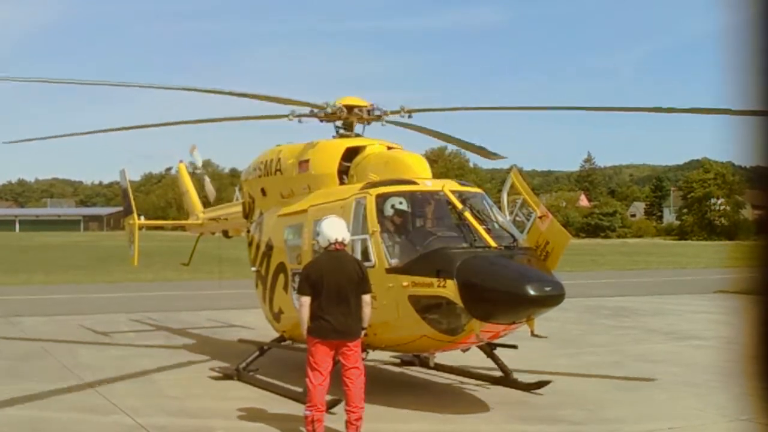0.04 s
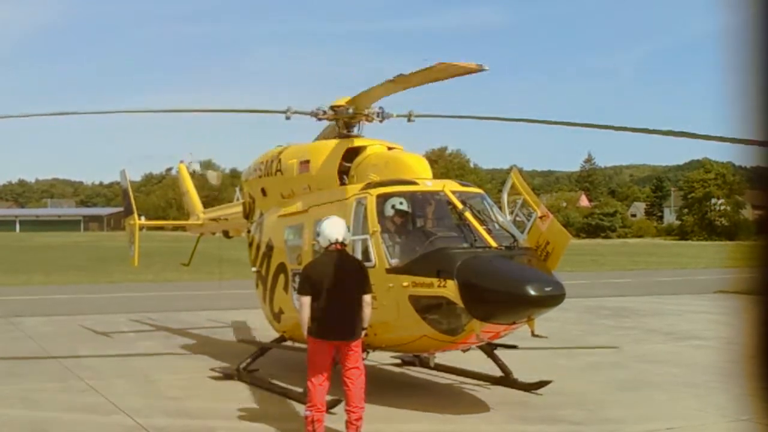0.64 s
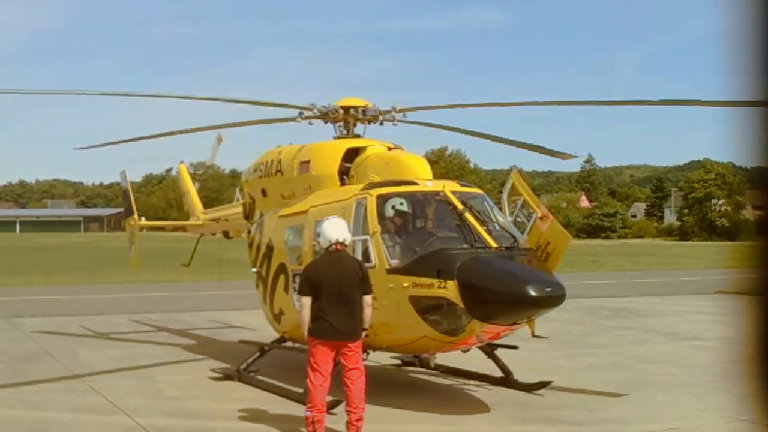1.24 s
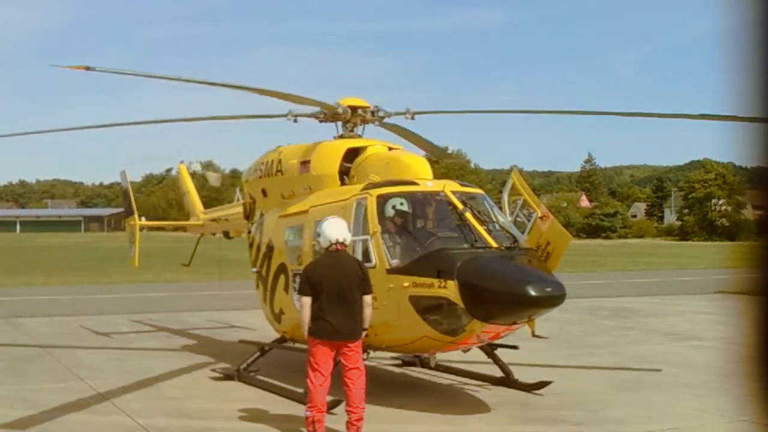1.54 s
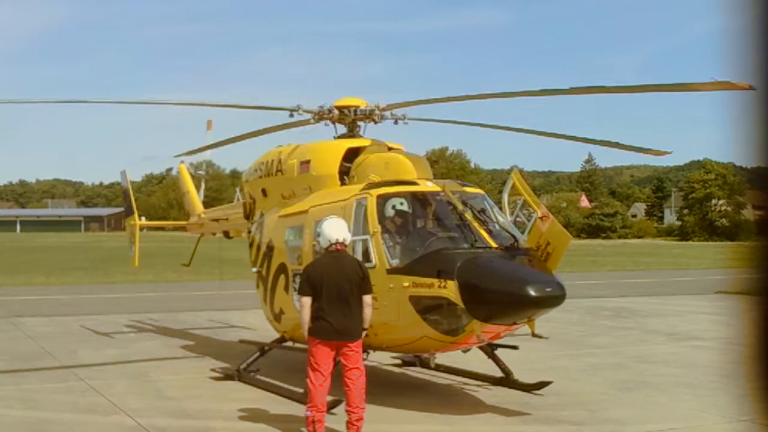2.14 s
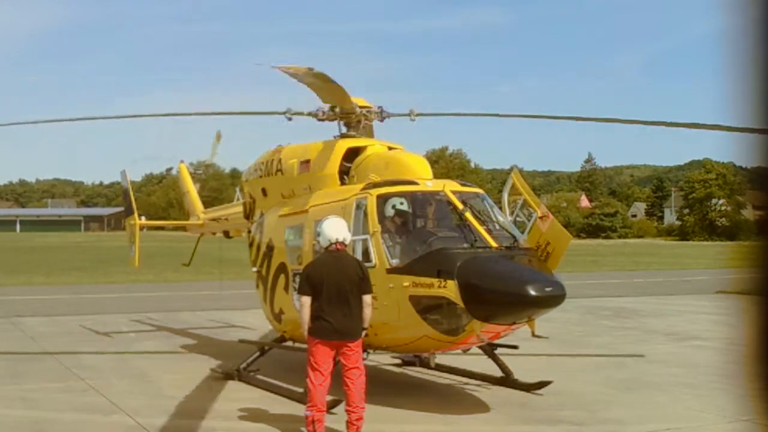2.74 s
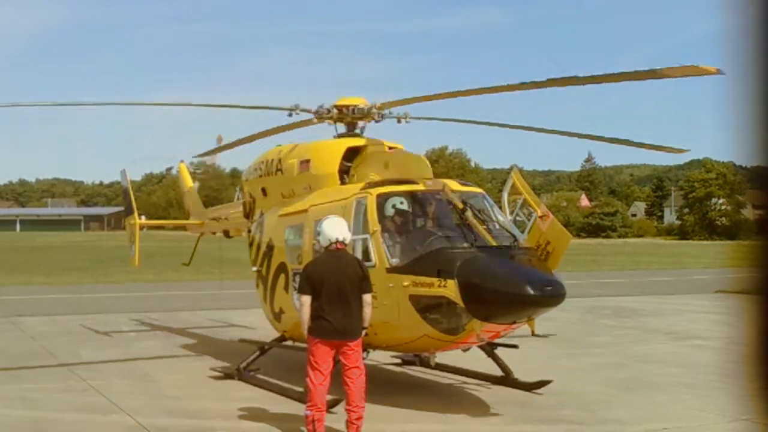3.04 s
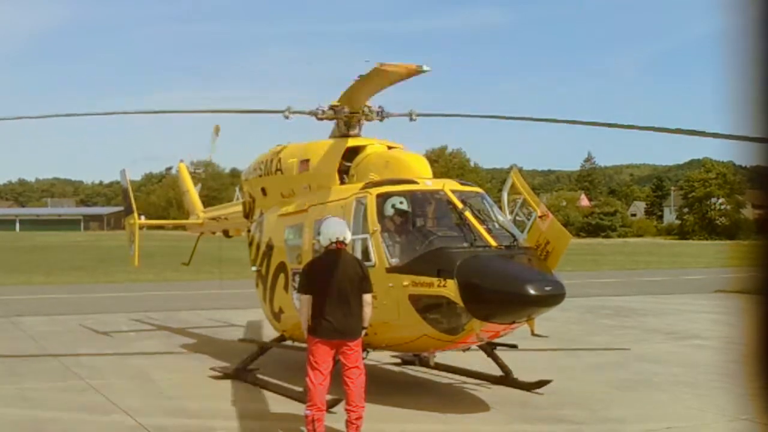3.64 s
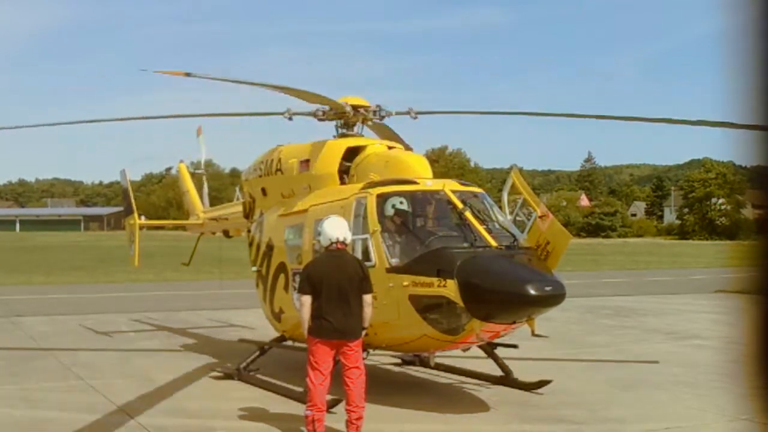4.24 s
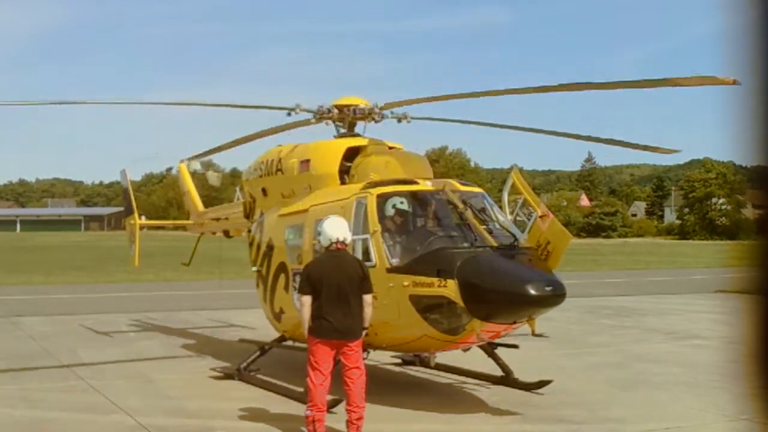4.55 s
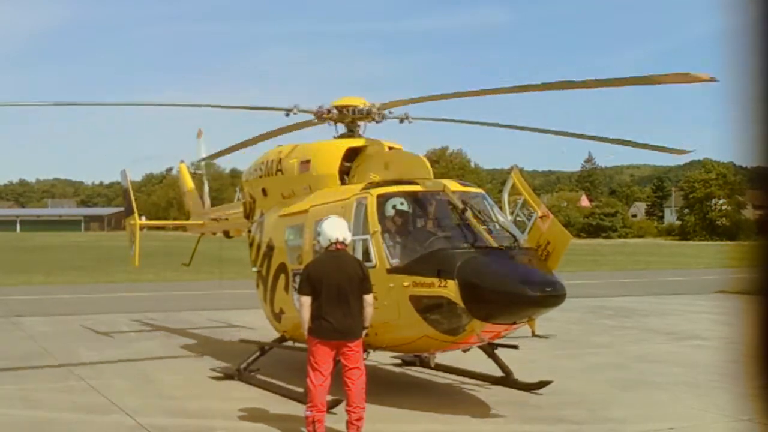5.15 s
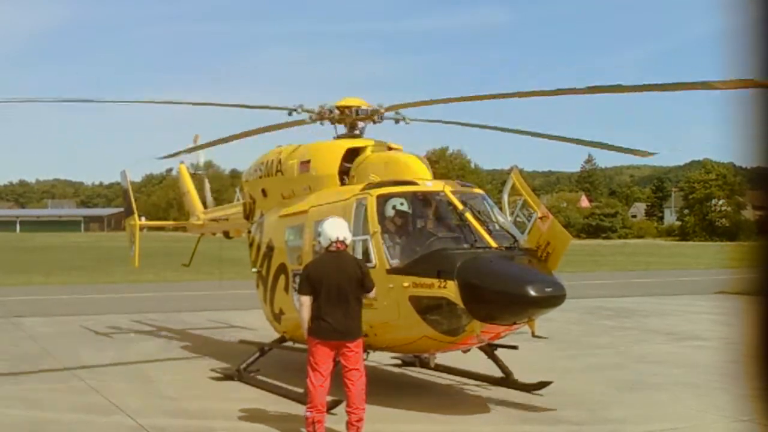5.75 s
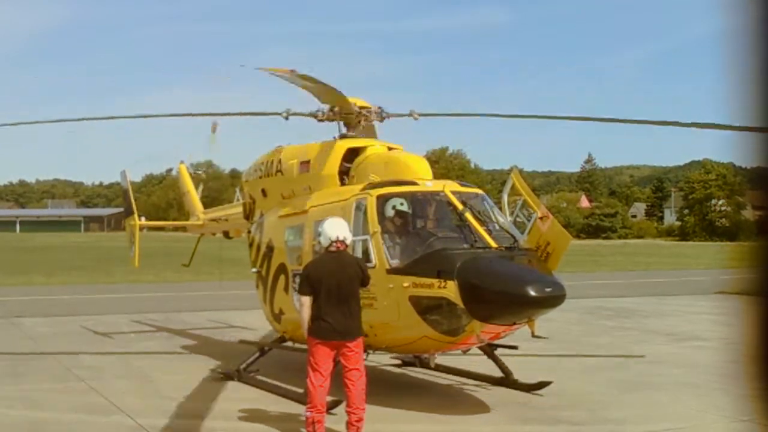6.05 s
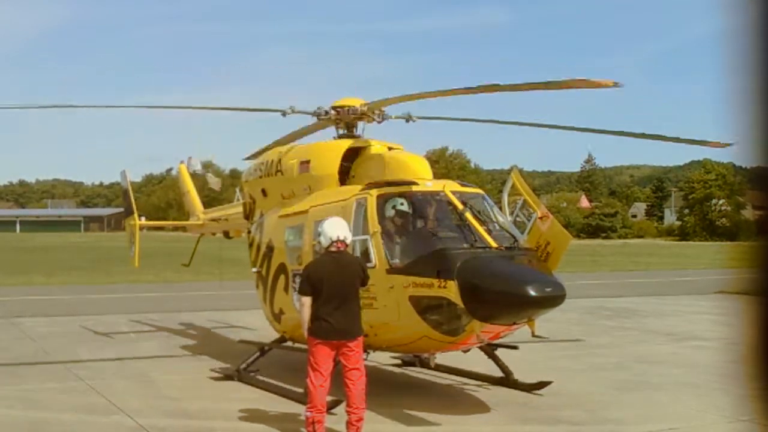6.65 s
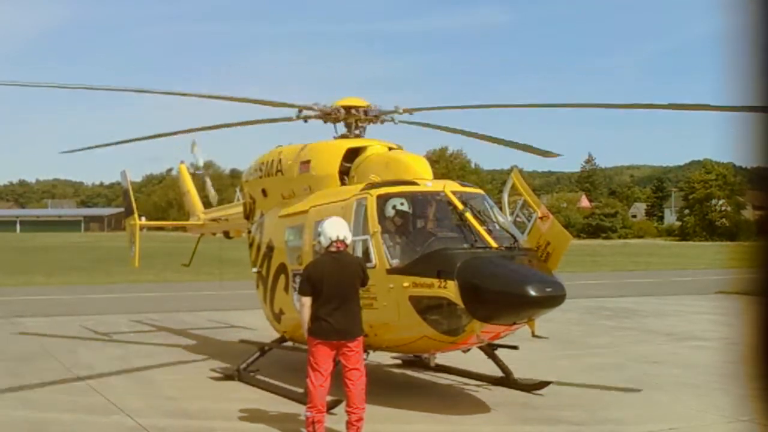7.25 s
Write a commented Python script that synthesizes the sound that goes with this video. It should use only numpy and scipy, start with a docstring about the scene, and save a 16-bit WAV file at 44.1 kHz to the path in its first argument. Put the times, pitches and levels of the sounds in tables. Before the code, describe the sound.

A helicopter's turbine starts up outdoors, a thin whine rising and fading over steadily growing hiss and hollow exhaust roar.

```python
"""A helicopter starts up on an open apron, its rotor still too slow to chop the air.
From the outset the burner rumbles under the intake hiss and a thin compressor whine.
Half a second in, the first of a few air puffs thumps the mono microphone. The whine climbs
with the shaft, swelling, fading and rasping, and is out of hearing after about five seconds.
The hiss and the hollow exhaust roar keep growing to the end."""
import sys
import numpy as np
from scipy import signal
from scipy.fft import rfft, irfft, next_fast_len
from scipy.io import wavfile
from scipy.ndimage import uniform_filter1d, map_coordinates

SR = 44100
rng = np.random.default_rng(int(sys.argv[2]) if len(sys.argv) > 2 else 0)


def master_out(mix):
    """Clip the mix to full scale and print it as 16-bit PCM to the path in sys.argv[1]."""
    frames = np.transpose(np.atleast_2d(mix))
    ceiling = np.clip(frames, -1, 1)
    pcm = np.round(ceiling * 32767).astype(np.int16)
    wavfile.write(sys.argv[1], SR, pcm)


N = 330309
TIME = np.arange(N) / SR

# air puffs on the microphone: (peak_s, level_db, half_width_s)
PUFFS = [(.557, -42.5, .015), (.6, -48, .035), (2.27, -51, .035), (5.18, -51, .022)]
# soft, bassy tone of a puff: (frequency_hz, gain_db)
PUFF_EQ = [(10, -13), (45, -3), (110, -4.5), (220, -5), (350, -23), (1500, -82)]
# low rumble of the burner: (frequency_hz, gain_db)
RUMBLE_EQ = [(10, -24), (30, -6), (50, -6), (68, 3.5), (88, -2), (120, -2), (170, -10), (300, -12),
             (600, -47), (2000, -90)]
# faint hum of the combustion chamber: (centre_hz, width_hz, gain_db)
CHAMBER_MODES = [(69, 18, 0)]
# drone of the burner can: (centre_hz, width_hz, gain_db)
CAN_MODES = [(417, 55, -5), (500.7, 128, -0.5)]
# low boom of the exhaust pipe: (centre_hz, width_hz, gain_db)
PIPE_MODES = [(181, 95, -3), (210, 48, 2)]
# hollow roar of the exhaust duct: (centre_hz, width_hz, gain_db)
DUCT_MODES = [(679, 110, -7), (827.7, 54, -1), (900, 110, -7), (1026, 62, -7), (1160, 143, -2),
              (1205, 40, 0.6), (1352, 78, -8.5), (1480, 50, -10), (1560, 138, -9.5), (1690, 150, -25),
              (1843, 91, -24.5), (2097, 81, -16), (2298, 190, -17), (2610, 200, -17)]
# slow swells of the flame: (time_s, drone_and_boom_db, rumble_and_hum_db)
FLAME_SWELLS = [(0, 0, -1), (1.1, 0.5, 1), (1.75, 0.5, 0), (2.65, -0.1, -0.5), (3.25, -.7, -0.5),
                (4.05, 0, -0.5), (5.25, 0.1, -0.5), (5.85, 0, 3.5), (6.45, -0.1, -0.5), (7.25, 2.5, .5),
                (7.5, 2, 0)]
# rush of the exhaust jet: (frequency_hz, gain_db)
JET_EQ = [(1000, -26), (1950, -22), (2120, -22), (2600, -8.5), (2900, -11), (3500, -4), (3950, -1),
          (4200, 1.5), (4700, 2), (6000, -17), (10000, -15)]
# narrow ringing of the nozzle: (centre_hz, width_hz, gain_db)
NOZZLE_MODES = [(2522, 39, -7.5), (2725, 54, -8.5), (3038, 50, -5.5), (3174, 45, -6), (3374, 59, -5),
                (3560, 48, -6.5), (4073, 55, -1.5), (4200, 49, 3), (4315, 62, 0)]
# fader moves for the air drawn into the engine: (time_s, hiss_gain_db, ring_gain_db)
INTAKE_FADERS = [(0, -44, -44.5), (.55, -44, -48.5), (1.25, -40, -44), (1.9, -41, -41.5),
                 (2.7, -39.5, -41.8), (3.35, -39.5, -42.7), (3.6, -39.3, -40), (3.8, -40, -42),
                 (4.1, -40.3, -41.3), (4.7, -38.5, -41), (5, -39, -43), (6.25, -37, -39.8),
                 (6.47, -38.5, -44.5), (7.05, -36, -38), (7.5, -36, -47)]
# broad hiss of the intake: (frequency_hz, gain_db)
HISS_EQ = [(2000, -45.5), (3000, -27), (4000, -15), (4800, -1.5), (5600, 0.5), (6430, 0.5), (6550, -1.5),
           (7000, -2), (7060, -8.5), (7560, -7), (7640, -11.5), (8700, -12.5), (10300, -22)]
# ringing of the inlet: (centre_hz, width_hz, gain_db)
INLET_MODES = [(5070, 100, -2.5), (5245, 380, 0), (5285, 50, -1.5)]
# fader moves for the blade-tip sizzle: (time_s, level_db)
SIZZLE_FADER = [(0, -58.5), (1.5, -65), (3, -53.5), (4.8, -47.5), (7.5, -51)]
# bright tone of that sizzle: (frequency_hz, gain_db)
SIZZLE_EQ = [(7000, -30.5), (8500, -12), (9050, 2), (9550, 4.5), (10300, -8.5)]
# faint pips above the whine: (peak_s, pitch_hz, level_db)
PIPS = [(1.09, 8880, -54), (1.23, 8300, -54), (1.27, 8600, -57), (1.645, 9005, -55), (1.875, 9005, -56)]
# shaft speed, heard as the compressor's blade-passing tone: (time_s, pitch_hz)
BLADE_PITCH = [(0, 7545), (1.75, 8478), (3.25, 9306), (4, 9770), (7.5, 11800)]
# how strongly that tone carries: (time_s, level_db)
WHINE_FADER = [(0, -52), (.18, -50), (.28, -66), (.48, -66), (.54, -54), (.85, -46.5), (.94, -59),
               (1.05, -56), (1.49, -45), (1.58, -60), (1.76, -46.5), (2.0, -40.5), (2.12, -60), (2.22, -44),
               (2.5, -46), (2.71, -36.5), (2.9, -47.5), (3.08, -42), (3.16, -57), (3.28, -45), (3.62, -36),
               (3.69, -47), (3.81, -41.5), (4.03, -53), (4.22, -41), (4.33, -49), (4.78, -43), (5.1, -62)]
# short rasps in the whine: (peak_s, level_db, half_width_s)
RASPS = [(1.59, -55, .05), (2.905, -45, .028), (3.15, -50, .025), (3.23, -49, .02)]
# treble roll-off of the microphone: (frequency_hz, gain_db)
MICROPHONE_EQ = [(9600, 0), (9900, -3.5), (10150, -13), (10400, -39.5)]


def amp(db):
    """Decibels to gain."""
    return 10 ** (np.asarray(db) / 20)


def unit(x):
    """Scale to rms 1."""
    return x / np.sqrt(np.mean(x ** 2) + 1e-20)


def curves(rows):
    """One automation curve for each column after the time."""
    times, *columns = np.transpose(rows)
    return [np.interp(TIME, times, column) for column in columns]


def swells(rows):
    """Bell-shaped envelopes, one a row, summed."""
    return sum(amp(db) * np.exp(-((TIME - peak_s) / half_width_s) ** 2)
               for peak_s, db, half_width_s in rows)


def wobble(rate_hz):
    """A smooth random curve, rate_hz knots a second."""
    return map_coordinates(rng.standard_normal(int(N * rate_hz / SR) + 4), [TIME * rate_hz])


def with_speed(start_db, db_per_octave):
    """A gain that rises by db_per_octave for each doubling of shaft speed."""
    pitch, = curves(BLADE_PITCH)
    return amp(start_db + db_per_octave * np.log2(pitch / pitch[0]))


def eq(points):
    """An EQ curve through the points, on a log frequency axis."""
    points_hz, db = np.transpose(points)
    return lambda hz: amp(np.interp(np.log(hz + 1), np.log(np.sort(points_hz) + 1), db))


def resonances(modes):
    """An EQ curve of steep-sided peaks whose powers add."""
    return lambda hz: np.sqrt(sum((amp(db) / (1 + (2 * (hz - centre) / width) ** 2)) ** 2
                                  for centre, width, db in modes))


def filtered(x, colour):
    """Pass x through the EQ curve colour."""
    size = next_fast_len(N + SR // 2)
    return irfft(rfft(x, size) * colour(np.fft.rfftfreq(size, 1 / SR)), size)[:N]


def turbulence(colour, patchy_db):
    """Coloured noise of rms 1 in which eddies make brief louder patches."""
    spectrogram = signal.stft(rng.standard_normal(N), nperseg=512)[2]
    patches = uniform_filter1d(rng.standard_normal(spectrogram.shape), size=6, axis=0)  # across pitch
    patches = uniform_filter1d(patches, size=14, axis=1)  # across time
    eddies = signal.istft(spectrogram * amp(patchy_db * unit(patches)))[1][:N]
    return unit(filtered(eddies, colour))


def breeze():
    """Puffs of air thump softly on the microphone."""
    return swells(PUFFS) * unit(filtered(rng.standard_normal(N), eq(PUFF_EQ)))


def burner():
    """The flame rumbles unevenly and roars through its can and the exhaust, growing with shaft speed."""
    flame_db, rumble_db = curves(FLAME_SWELLS)
    roar = with_speed(-50.5, db_per_octave=11) * turbulence(resonances(DUCT_MODES), patchy_db=0.87)
    drone = with_speed(-52.5, db_per_octave=11.5) * turbulence(resonances(CAN_MODES), patchy_db=0.6)
    boom = with_speed(-55.3, db_per_octave=10.5) * turbulence(resonances(PIPE_MODES), patchy_db=0.9)
    rumble = with_speed(-57, db_per_octave=2) * turbulence(eq(RUMBLE_EQ), patchy_db=-0.5)
    hum = with_speed(-69.5, db_per_octave=12.5) * turbulence(resonances(CHAMBER_MODES), patchy_db=-1.5)
    return roar + amp(flame_db) * (drone + boom) + amp(rumble_db) * (rumble + hum)


def exhaust(jet_trim_db, nozzle_trim_db):
    """Hot gas leaves as a rushing jet that rings the nozzle, louder as the shaft speeds up."""
    jet = amp(jet_trim_db) * turbulence(eq(JET_EQ), patchy_db=0.55)
    nozzle = amp(nozzle_trim_db) * turbulence(resonances(NOZZLE_MODES), patchy_db=1.9)
    return with_speed(-52, db_per_octave=14) * (jet + nozzle)


def intake(hiss_trim_db, ring_trim_db):
    """Air drawn into the engine hisses, and rings the inlet in surges."""
    flow_db, surge_db = curves(INTAKE_FADERS)
    hiss = amp(flow_db + hiss_trim_db) * turbulence(eq(HISS_EQ), patchy_db=0.5)
    ring = amp(surge_db + ring_trim_db) * turbulence(resonances(INLET_MODES), patchy_db=1.5)
    return hiss + ring


def blade_tips():
    """The racing blade tips lay a fine, smooth sizzle on top of the hiss."""
    level_db, = curves(SIZZLE_FADER)
    return amp(level_db) * unit(filtered(rng.standard_normal(N), eq(SIZZLE_EQ)))


def pips(half_width_s):
    """Brief thin whistles, each a steady sine that fades in and out."""
    return sum(swells([(peak_s, db, half_width_s)]) * np.sqrt(2) * np.sin(2 * np.pi * hz * TIME)
               for peak_s, hz, db in PIPS)


def compressor(scatter, flutter_hz, drift_hz, rasp_width_hz, rasp_floor_db):
    """The blade tone rises with the shaft and flutters against its own scattered sound."""
    pitch, = curves(BLADE_PITCH)
    level_db, = curves(WHINE_FADER)
    phase = 2 * np.pi * np.cumsum(pitch + drift_hz * wobble(25)) / SR
    scattered = wobble(flutter_hz) * np.sin(phase) + wobble(flutter_hz) * np.cos(phase)
    tone = amp(level_db) * unit(np.sin(phase) + scatter * scattered)
    # disturbed inflow smears the tone into a noise band centred just above it
    eddies = filtered(rng.standard_normal(N), lambda hz: np.exp(-(hz / rasp_width_hz) ** 2))
    rasp = unit(eddies * np.sin(phase + np.pi * rasp_width_hz * TIME))
    return tone + rasp * (swells(RASPS) + amp(rasp_floor_db))


def scene():
    """The whole engine in open air, alike in both channels."""
    whine = compressor(scatter=0.42, flutter_hz=40, drift_hz=4, rasp_width_hz=357, rasp_floor_db=-67.5)
    whine += pips(half_width_s=0.025)
    hiss = intake(hiss_trim_db=2.5, ring_trim_db=1) + blade_tips()
    rush = exhaust(jet_trim_db=2.5, nozzle_trim_db=-5.5)
    bed = burner() + breeze()
    return np.tile(bed + rush + hiss + whine, (2, 1))


def record(dry):
    """The microphone's top end rolls off into a hard cut; the converter sits slightly off zero."""
    cutoff_hz, dc_offset = 10400, 0.0027
    roll_off = eq(MICROPHONE_EQ)
    channels = [filtered(side, lambda hz: roll_off(hz) * (hz < cutoff_hz)) for side in dry]
    return np.array(channels) + dc_offset


dry = scene()
out = record(dry)
master_out(out)
```